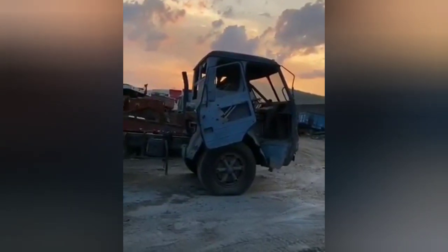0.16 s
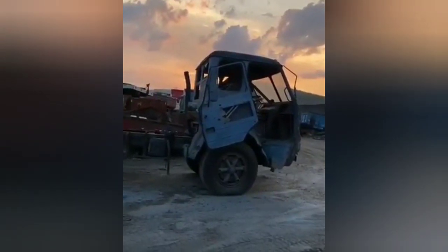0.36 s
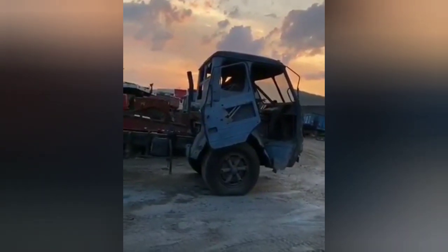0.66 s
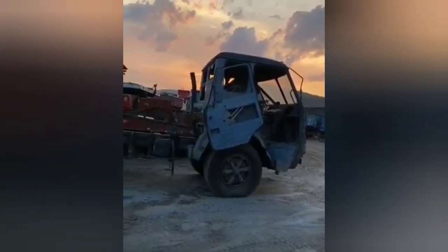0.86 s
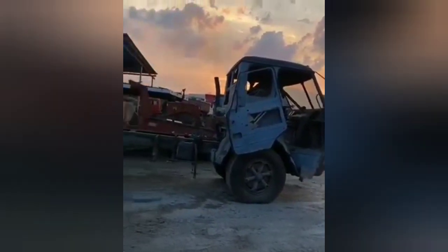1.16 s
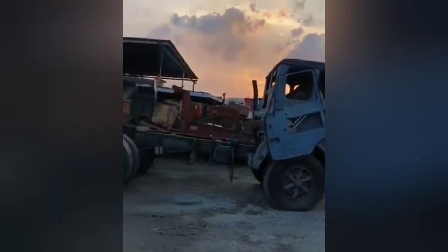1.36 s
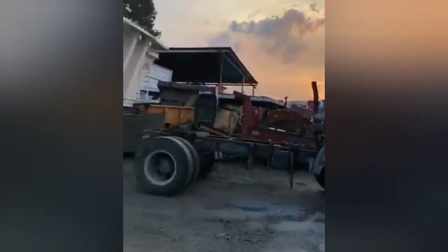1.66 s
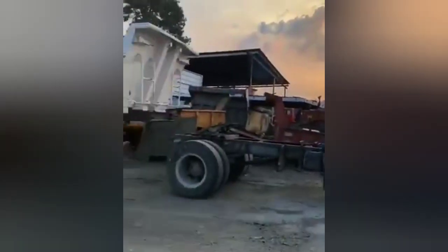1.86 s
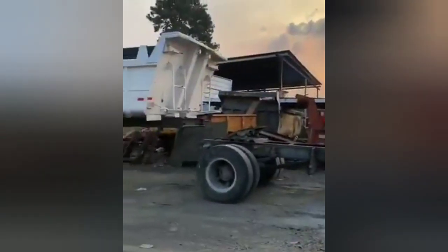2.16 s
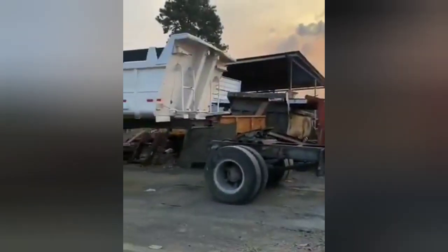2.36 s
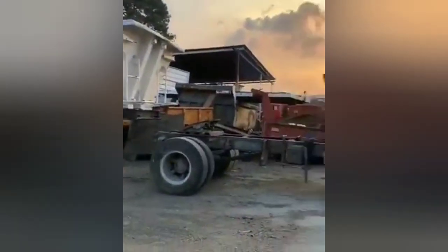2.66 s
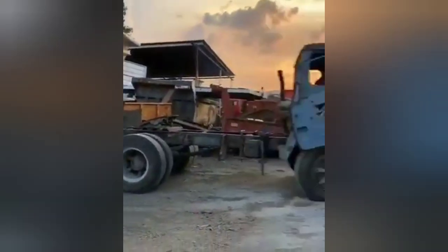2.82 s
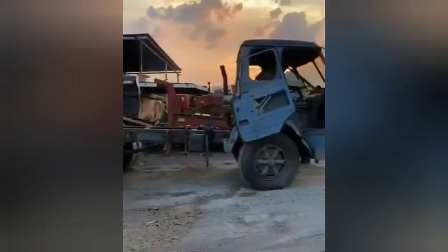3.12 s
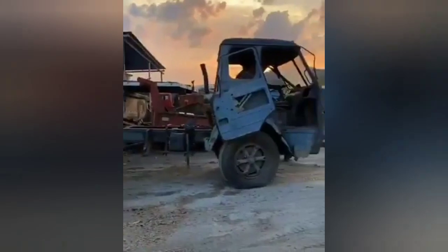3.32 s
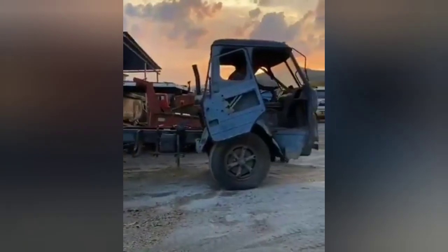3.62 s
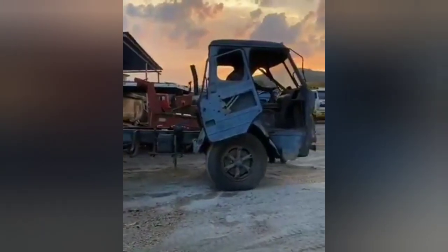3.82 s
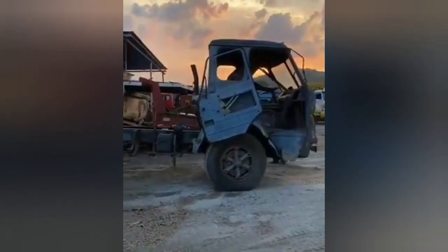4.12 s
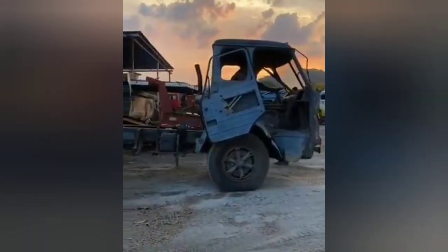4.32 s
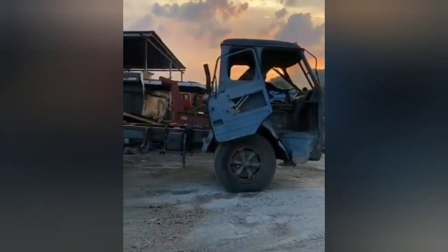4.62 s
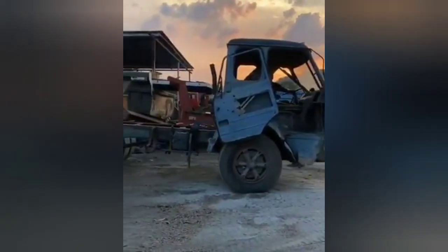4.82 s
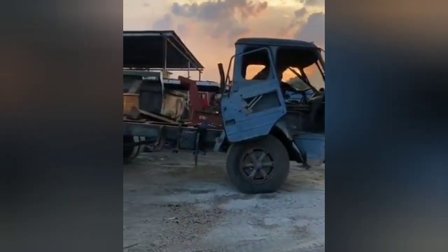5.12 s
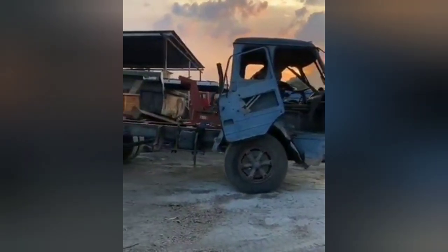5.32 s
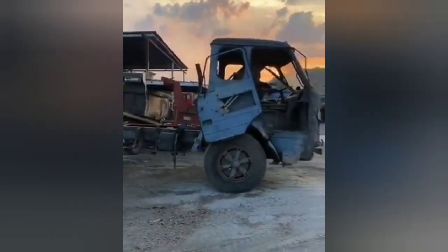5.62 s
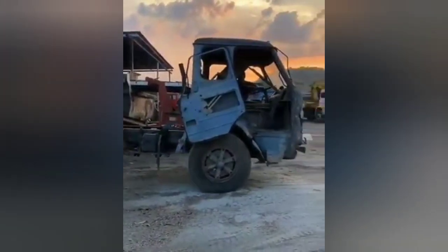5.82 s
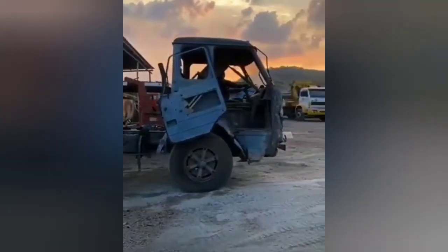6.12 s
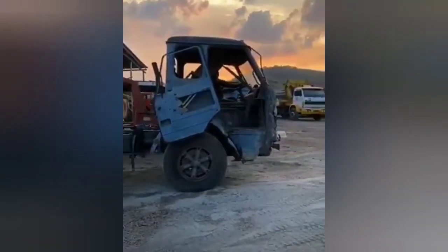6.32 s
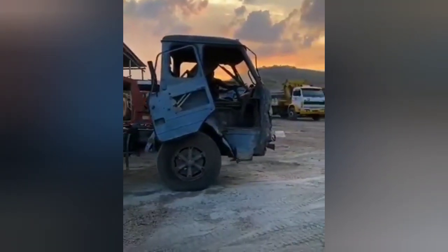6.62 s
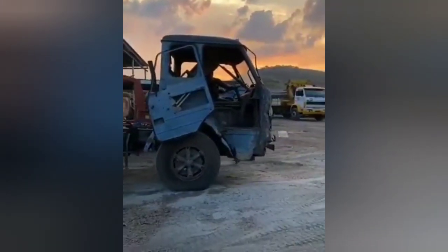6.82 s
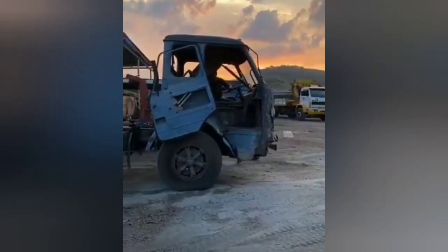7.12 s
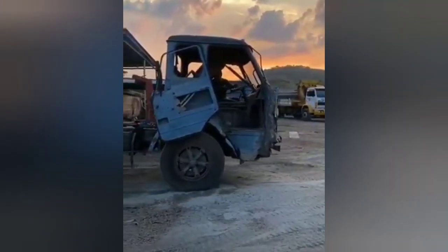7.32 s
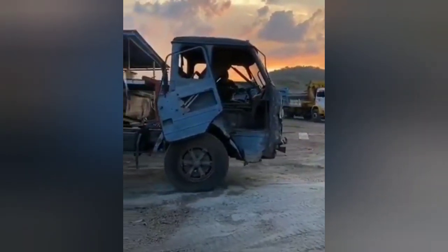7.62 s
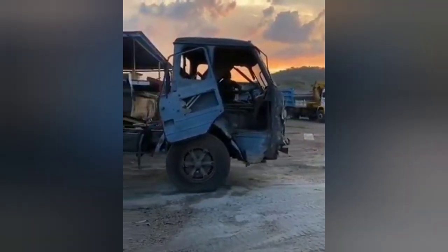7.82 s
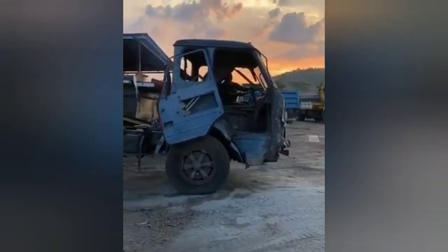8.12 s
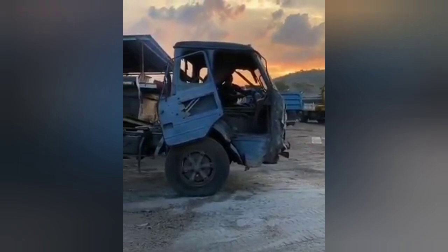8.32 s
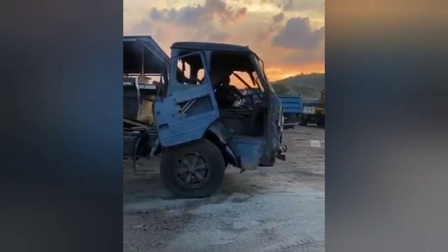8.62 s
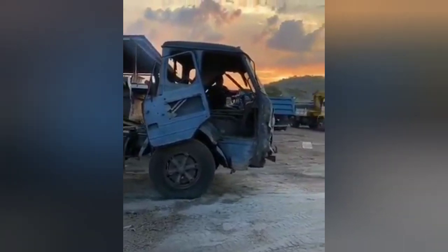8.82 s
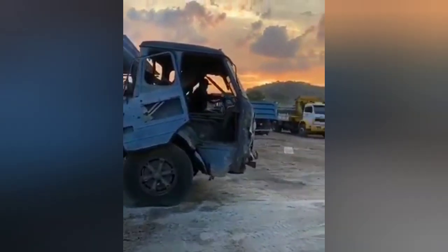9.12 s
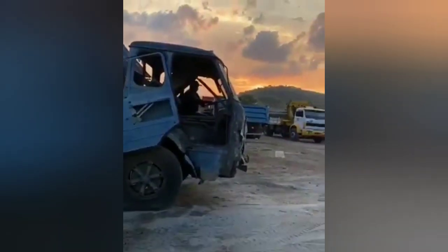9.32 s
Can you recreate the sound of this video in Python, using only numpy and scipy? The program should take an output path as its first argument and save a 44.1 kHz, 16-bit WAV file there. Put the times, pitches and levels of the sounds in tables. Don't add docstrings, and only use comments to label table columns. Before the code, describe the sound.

An old eight-cylinder diesel truck runs continuously in an open yard, a phone moving a few metres away. At 0 s it is already revving, barking hard until 0.35; a second quick blip peaks around 1.1. It falls to a slower, clattering run by 2.3, valve gear rattling and a loose valve knocking once per engine cycle, about nine times a second. A long push from 2.4 to 3.0 opens with a ringing pop, with a softer one to 3.3. Knocks stand out most near 3.3 and gradually fade later. Middling blip at 4.2-4.5, brief tap at 5.5, then a sudden hard push at 5.9-6.5 with the loudest metallic pop. A short strong blip comes at 7.4, the softest at 8.0, and a slow final push rises from 9.1 to the end. Between blips, air hisses in pulses and loose panels hum faintly. The sound is wide, rough and slightly watery.

```python
import sys
import numpy as np
from scipy import signal
from scipy.fft import rfft, irfft, next_fast_len
from scipy.io import wavfile
from scipy.ndimage import uniform_filter1d

SR = 44100
rng = np.random.default_rng(int(sys.argv[2]) if len(sys.argv) > 2 else 0)


def inscribe(sig):
    pcm = np.round(np.clip(np.atleast_2d(sig).T, -1, 1) * 32767)
    wavfile.write(sys.argv[1], SR, pcm.astype(np.int16))


def amplitude_ratio(level_db):
    exponent = np.asarray(level_db, float) / 20
    return 10 ** exponent


N = 417186
T = np.arange(N) / SR
COARSE = T[::64]

# time in seconds, firings of one cylinder bank in Hz.
ENGINE_SPEED = [(0, 35.68), (.36, 48.83), (.74, 36.97), (1.14, 50.96), (1.62, 32.18), (2.34, 25.87),
                (2.72, 34.44), (3.11, 48.55), (4.16, 26.45), (4.42, 31.94), (5.62, 32.03), (5.88, 29.04),
                (6.46, 46.72), (6.98, 28.59), (7.53, 32.39), (7.95, 27.96), (8.95, 25), (9.46, 36.57)]
# pedal down in seconds, pedal up in seconds, bark level in dB, boom level in dB,
# time to press the pedal in seconds.
BLIPS = [
    (0, 0.343, -31.5, 1, 0.085),
    (.78, 1.118, -31.5, 3, 0.062),
    (2.42, 3.046, -33, 0, 0.081),
    (3.0, 3.3, -40.5, -4.5, 0.078),
    (4.2, 4.5, -36, -1, 0.056),
    (5.46, 5.656, -37.5, -1, 0.076),
    (5.93, 6.46, -32, 2, 0.037),
    (7.34, 7.53, -32.5, 2, 0.1),
    (8.0, 8.22, -42.5, -3, .08),
    (9.13, 9.5, -33.5, 0, 0.15),
]


def evened(x):
    return x / np.sqrt(np.mean(abs(x) ** 2) + 1e-20)


def read(points, hz):
    f, *values = np.transpose(points)
    return np.squeeze([np.interp(np.log(hz + 1), np.log(f + 1), v) for v in values])


def curves(rows, t=T):
    s, *columns = np.transpose(rows)
    return [np.interp(t, s, c) for c in columns]


def coloured(x, points):
    size = next_fast_len(N)
    gain = amplitude_ratio(read(points, np.fft.rfftfreq(size, 1 / SR)))
    return irfft(rfft(x, size) * gain, size)[:N]


def resonate(x, hz, width):
    r = np.exp(-np.pi * width / SR)
    return 2 * signal.lfilter([1 - r], [1, -r * np.exp(2j * np.pi * hz / SR)], x).real


def in_band(x, lo_hz, hi_hz):
    sos = signal.butter(N=4, Wn=[lo_hz, hi_hz], btype="band", fs=SR, output="sos")
    return x / signal.sosfilt(sos, x).std()


def drift(span_s):
    size = int(span_s * SR)
    smooth = uniform_filter1d(rng.standard_normal(N), size)
    return evened(uniform_filter1d(smooth, size))


def cycles():
    # time in seconds, engine cycles so far (the loose valve shuts at whole numbers).
    counted = [(0, .536), (.45, 5.185), (1.05, 11.288), (1.65, 17.436), (2.1, 20.88), (2.55, 23.541),
               (3.0, 27.664), (3.6, 33.975), (4.2, 38.7), (4.95, 44.576), (5.7, 50.328), (6.0, 52.236),
               (6.75, 59.763), (7.35, 64.466), (7.65, 66.734), (7.95, 68.533), (8.7, 73.386),
               (9.45, 78.657)]
    s, count = np.transpose(counted)
    turns = np.cumsum(curves(ENGINE_SPEED)[0])
    angle = np.interp(turns, np.interp(s, T, turns), count)
    return uniform_filter1d(angle, size=5001, mode="nearest")


def throbbing(points, patchy_db, depth, overtone):
    # pitch in Hz, swing in dB, lag in engine cycles.
    throb = [(60, 0, 0.27), (282, 0.5, 0.25), (480, -3, 0.36), (695, 0, -0.25), (1400, 1, -0.11),
             (3060, 1.5, 0.053), (8000, 3.5, 0.082)]
    frames, hz = N // 128 + 5, np.fft.rfftfreq(512, 1 / SR)
    a, b, patches = rng.standard_normal((frames, 257, 3)).T
    patches = uniform_filter1d(patches, 9, axis=0)
    patches = evened(uniform_filter1d(patches, 14, axis=1))
    swing_db, lag = read(throb, hz)[:, :, None]
    angle = np.interp(np.arange(frames) * 128, np.arange(N), cycles())
    phase = 2 * np.pi * (angle - lag)
    swing = np.cos(phase) + overtone * np.cos(2 * phase - .8)
    z = (a + 1j * b) * amplitude_ratio(depth * swing_db * swing + patchy_db * patches)
    noise = signal.istft(z, nperseg=512, noverlap=384)[1][:N]
    return coloured(noise, points)


def windows():
    release_s = .032
    return np.array([np.clip((COARSE - down) / press, 0, 1) * np.exp(-np.maximum(COARSE - up, 0) / release_s)
                     for down, up, _, _, press in BLIPS])


def effort(stumble_db=0):
    # time in seconds, how squarely the walking listener faces the engine bay in dB.
    facing = [(0, 0.5), (.7, 1), (1.2, -0.5), (1.95, 0.5), (2.36, -2.5), (2.6, 0.5), (3.6, 1.5), (4.05, 0),
              (4.6, .5), (5.8, 0), (6.3, 1.5), (6.8, 2), (7.3, -1), (7.55, 0), (8.3, -.5), (9.46, 2)]
    coast_db, coast_db_per_hz = [-39.5, -36, -51], [0.32, 0.287, 0.26]
    fuel_share_db = [-0.5, -2.5, -24]
    facing_share = [.3, 1.01, 1.02]
    fuel_db_per_hz = 0.3241
    over_hz = curves(ENGINE_SPEED, COARSE)[0] - 40
    facing_db = curves(facing, COARSE)[0]
    fuel = amplitude_ratio(np.transpose(BLIPS)[2]) @ windows() * amplitude_ratio(fuel_db_per_hz * over_hz + stumble_db)
    levels = []
    for db, slope, fuel_db, share in zip(coast_db, coast_db_per_hz, fuel_share_db, facing_share):
        power = amplitude_ratio(db + slope * over_hz) ** 2 + (amplitude_ratio(fuel_db) * fuel) ** 2
        levels.append(np.interp(T, COARSE, facing_db * share + 10 * np.log10(power)))
    return levels


def boom():
    # pitch in Hz, level passed by the pipe in dB.
    pipe = [(33, -37.5), (48, -26.5), (55, -40), (64, -28), (71, -32.5), (83, -22.5), (98, -24), (120, -36)]
    coast_drop = [-17, -10, -12]
    load_lift = [1.7, -0.4, -2]
    loaded_flutter_db, coast_flutter_db = .6, 2.4
    hz, opened = curves(ENGINE_SPEED, COARSE)[0], windows()
    turns = np.cumsum(curves(ENGINE_SPEED)[0]) / SR
    load = amplitude_ratio(np.transpose(BLIPS)[3]) @ opened
    flutter_db = coast_flutter_db + (loaded_flutter_db - coast_flutter_db) * opened.max(0)
    out = np.zeros(N)
    for k, (drop_db, lift_db) in enumerate(zip(coast_drop, load_lift), 1):
        strength = np.sqrt(2) * np.hypot(load * amplitude_ratio(lift_db), amplitude_ratio(drop_db))
        passed = amplitude_ratio(read(pipe, k * hz) - 5.5 + flutter_db * drift(0.05)[::64])
        tone = -np.cos(2 * np.pi * k * turns - 0.32 * k * k)
        out += np.interp(T, COARSE, strength * passed) * tone
    return out


def bark():
    # pitch in Hz, level in dB per Hz.
    colour = [(25, -36), (90, -15), (130, -11.5), (170, 3), (215, -48), (280, 1), (400, -7), (520, -13.5),
              (750, -4.5), (1150, -18.5), (1360, -13.5), (1970, -22.5), (2450, -20), (4500, -38),
              (6000, -63)]
    cylinder_db = np.array([-1.5, -4.5, -5.5, -8, -5.0, -3, -11.5, -5.5])
    firings = np.cumsum(2 * curves(ENGINE_SPEED)[0]) / SR
    which = firings.astype(int)
    strength = amplitude_ratio(cylinder_db[which % 8] + 2 * rng.standard_normal(1000)[which])
    pulses = evened(-np.diff(which, prepend=0) * strength)
    puffs = evened((0.73 + strength * np.exp(-(firings % 1) / 0.5)) * rng.standard_normal(N))
    drive = .5 * pulses + 1.6 * puffs
    piped = drive + 2.0 * resonate(drive, 424.4, 22.4)
    sound = in_band(coloured(piped, colour), 315, 431.5)
    stumble_db = .7 * drift(0.038)[::64]
    level_db, clatter_db, _ = effort(stumble_db)
    idle = amplitude_ratio(clatter_db - 4.5)
    return sound * np.sqrt(np.maximum(amplitude_ratio(level_db) ** 2 - idle ** 2, 1e-8))


def clatter():
    # pitch in Hz, level in dB per Hz.
    colour = [(15, -54), (25, -21), (40, -1.5), (70, 2.5), (217, -3), (264, -8.5), (343, -13), (417, -7.5),
              (455, -16), (632, -10), (1070, -16), (1420, -15), (1510, -16), (2670, -24.5), (4600, -34),
              (5980, -60), (10100, -120)]
    # pitch in Hz, width in Hz, level in dB.
    panels = [(264.6, 29, -4), (545.6, 18.3, 2), (645, 81, -5), (749, 14, -3.5), (806.3, 6.8, 6.5),
              (1101, 6.5, 3), (1234, 5.4, 0.5), (1320, 6.8, 2.5), (2630, 31, -3)]
    noise = throbbing([(20, 0.0047), (20000, 0)], patchy_db=1.5, depth=0.92, overtone=0.21)
    ringing = sum(amplitude_ratio(db + 1.5) * resonate(noise, hz, width) for hz, width, db in panels)
    sound = in_band(coloured(noise + ringing, colour), 977, 2900)
    bark_db, level_db, _ = effort()
    load = 1 / (1 + amplitude_ratio(bark_db - level_db - 4.5) ** 2)
    return sound * amplitude_ratio(level_db - 0.6) * load ** 1.53


def knock():
    # pitch in Hz, time to fade by 60 dB in seconds, lag in engine cycles.
    ring_notes = [(271, 0.091, 0.1294), (716.4, 0.05, -.06), (1382, 0.077, -0.12), (2367, 0.065, -0.041)]
    # time in seconds, blow of the loose valve in dB.
    blows = [
        (0, -22),
        (1.8, -20.5),
        (2.35, -33.5),
        (3.3, -18.5),
        (4.3, -26.5),
        (5.6, -31.5),
        (6.95, -24.5),
        (7.9, -39),
        (9.46, -43.5),
    ]
    out, t = np.zeros(N + SR), np.arange(5000) / SR
    thud_db = curves(blows)[0]
    masked_db = -4 * np.interp(T, COARSE, windows().max(0))
    ring_db = -22 + .3 * thud_db + masked_db
    angle = cycles()
    levels = [thud_db, ring_db + 4.5, ring_db, ring_db - 8.5]
    for (hz, t60, lag), level_db in zip(ring_notes, levels):
        chance = rng.standard_normal((78, 3))
        strikes = np.arange(1, 79) + lag + .015 * chance[:, 0]
        at = np.interp(strikes, angle, np.arange(N)).astype(int)
        for i, (_, tune, force) in zip(at, chance):
            tone = np.sin(2 * np.pi * hz * (1 + 0.028 * tune) * t)
            ring = tone * (1 - np.exp(-t / 0.015)) * amplitude_ratio(-60 * t / t60)
            out[i:i + len(t)] += amplitude_ratio(level_db[i] + 8 + 1 * force) * ring
    return out[:N]


def leak():
    # pitch in Hz, level in dB per Hz.
    colour = [(3500, -38), (4600, 1), (5200, 4.5), (6700, 2), (7600, 0), (9100, 0), (10800, -5),
              (11600, -6.5), (12100, 1)]
    hiss = throbbing(colour, patchy_db=2.0, depth=0.36, overtone=-0.5)
    return amplitude_ratio(effort()[2] - 0.7) * in_band(hiss, 6200, 9540)


def lumps():
    # time in seconds, peak in dB, pitch in Hz.
    strokes = [(0.07, -21, 310), (0.153, -19, 408), (0.232, -26, 385), (0.336, -20, 326), (0.837, -18, 394),
               (0.947, -19, 420), (1.025, -26, 406), (2.619, -18, 400), (2.736, -22, 338.6),
               (2.825, -21, 385), (3.015, -19, 330), (4.531, -25, 417.5), (5.959, -26, 423),
               (6.089, -26, 429), (6.415, -22, 392), (7.44, -25, 396), (9.242, -24, 340.6),
               (9.36, -34, 328)]
    rise_s, t60_s = .004, 0.11
    out, t = np.zeros(N + SR), np.arange(4000) / SR
    for s, peak_db, hz in strokes:
        envelope = amplitude_ratio(peak_db + 1.5 - 60 * t / t60_s) * (1 - np.exp(-t / rise_s))
        out[int(s * SR):][:len(t)] += envelope * np.sin(2 * np.pi * hz * t)
    return out[:N]


def pops():
    # time in seconds, peak in dB.
    firings = [
        (2.44, -11.5),
        (2.615, -16),
        (5.943, -11),
        (5.975, -5),
        (6.087, -15),
        (7.439, -15),
        (9.279, -27.5),
    ]
    # pitch in Hz, level in dB, time to fade by 60 dB in seconds.
    pipe_notes = [(397, -5, 0.14), (661, -2, 0.084), (896, 7, 0.02), (1270, -12, 0.049)]
    out, t = np.zeros(N), np.arange(4000) / SR
    for s, peak_db in firings:
        tune = 1 + 0.032 * rng.standard_normal(len(pipe_notes))
        ring = sum(amplitude_ratio(db - 60 * t / t60) * np.sin(2 * np.pi * hz * k * t)
                   for (hz, db, t60), k in zip(pipe_notes, tune))
        out[int(s * SR):][:len(t)] += amplitude_ratio(peak_db - 11.5) * ring * (1 - np.exp(-t / 0.0013))
    return out


def hum():
    # start in seconds, end in seconds, which panel (counted from 0), level in dB.
    songs = [(3.3, 4.3, 0, -48.5), (5.05, 5.9, 0, -46.5), (6.55, 7.1, 0, -45), (7.75, 8.5, 0, -42.5),
             (7.4, 7.1, 0, -53), (4.8, 7.6, 1, -56.5), (7.75, 8.8, 1, -60), (9.1, 7.5, 1, -58),
             (4.45, 5.02, 2, -42), (6.9, 7.4, 2, -48)]
    swell_s, waver_db = 0.094, 2.6
    out = np.zeros(N)
    for panel, (hz, wander) in enumerate(zip([420, 2670, 272], [.004, .009, .006])):
        level = np.zeros(N)
        for start, end, which, db in songs:
            if round(which) == panel:
                level += amplitude_ratio(db) * np.clip(np.minimum(T - start, end - T) / swell_s, 0, 1)
        phase = 2 * np.pi * np.cumsum(hz * (1 + wander * drift(0.0505))) / SR
        out += np.sqrt(2) * level * amplitude_ratio(waver_db * drift(0.04)) * np.sin(phase)
    return out


def yard(x):
    z = signal.stft(x, nperseg=1024)[2]
    scrambled = z * np.exp(2j * np.pi * rng.random(z.T.shape).T)
    return evened(signal.istft(scrambled, nperseg=1024)[1][:N]) * x.std()


def scene():
    # pitch in Hz, share of the side (port difference) in step with the mid (port average),
    # share a quarter wave late.
    lean = [(150, 0, 0.54), (300, 0.34, 1), (600, -0.059, 0.55), (1200, -0.37, 0.53), (2400, -0.2, 0.32),
            (5000, -0.11, 0.44), (11000, -0.024, 0.48)]
    # pitch in Hz, side minus mid in dB.
    ports = [(60, -66), (170, -71), (260, -20), (450, -5), (700, -5), (1100, 0), (1500, -11), (2500, -2.5),
             (3400, 3), (4500, 11), (5300, -5.5), (7600, 3), (9500, -5.5), (11400, 3.5)]
    truck = boom() + bark() + clatter() + knock() + leak() + lumps() + pops() + hum()
    in_step, late = read(lean, np.fft.rfftfreq(N, 1 / SR))
    direct = irfft(rfft(truck) * (in_step - 1j * late), N)
    side = coloured(direct + 0.65 * yard(truck), ports)
    return np.array([truck + side, truck - side])


def starve(x, column):
    # pitch in Hz, share of time a band is empty in the mid, the same in the side,
    # part of the local rms under which lines are lost.
    starved = [(100, 0, .9, 0), (300, 0, .03, .2), (1350, 0, .05, .35), (1650, 0, .9, .45),
               (2350, 0, .9, .5), (2650, 0, .03, .55), (3850, 0, .02, .75), (4100, .5, .02, 1),
               (4850, .75, .03, 1), (5150, 0, .1, .8), (5700, 0, .8, .75), (7300, 0, .75, .75),
               (7600, .2, .7, .85), (7950, 0, .4, .7), (10900, 0, .35, .75), (11500, .5, .3, 1),
               (11900, .95, .3, 1)]
    # time in seconds, half length in seconds, thrift added to the usual 1.
    shortages = [
        (.4, .35, 1),
        (1.18, .14, 1.2),
        (3.902, 0.3, 4.9),
        (6.799, .2, 1.6),
        (7.594, 0.37, 2),
    ]
    hz, t, z = signal.stft(x, SR, nperseg=2048, noverlap=1024)
    chance = rng.standard_normal((z.shape[1], len(hz) // 8 + 1))
    chance = uniform_filter1d(chance, size=3, axis=0)
    chance = evened(uniform_filter1d(chance, size=3, axis=1))
    chance = np.repeat(chance, 8, axis=1)
    rank = 1 / (1 + np.exp(-1.7 * chance.T[:len(hz)]))
    share, weak = read(starved, hz)[[column, 2], :, None]
    extra_thrift = sum(extra * np.exp(-((t - s) / half) ** 2) for s, half, extra in shortages)
    thrift = (1.0 + extra_thrift) ** (1 - column)
    rms = np.sqrt(abs(uniform_filter1d(abs(z) ** 2, size=24, axis=0)))
    kept = z * (rank > share ** (1 / thrift)) * (abs(z) > weak * rms)
    return signal.istft(kept, nperseg=2048, noverlap=1024)[1][:N]


def band_limit(x):
    return signal.sosfilt(signal.butter(12, 12010, fs=SR, output="sos"), x)


def record(dry):
    mid = starve(dry.mean(0), column=0)
    side = starve((dry[0] - dry[1]) / 2, column=1)
    return band_limit(np.array([mid + side, mid - side]))


dry = scene()
out = record(dry)
inscribe(out)
```